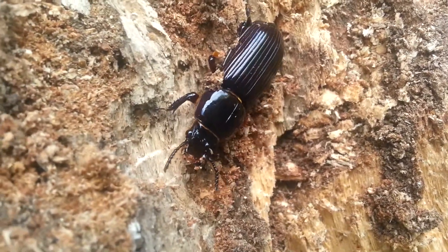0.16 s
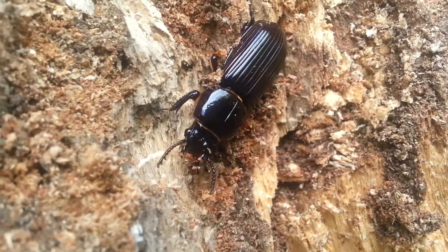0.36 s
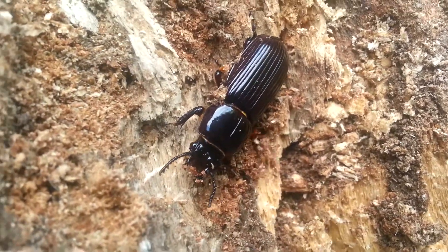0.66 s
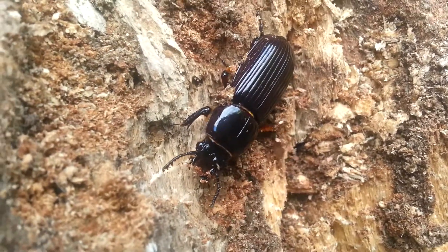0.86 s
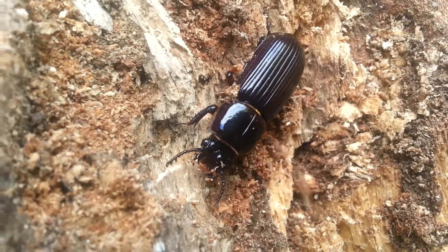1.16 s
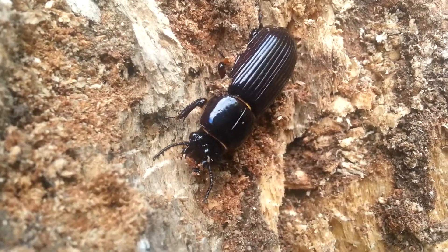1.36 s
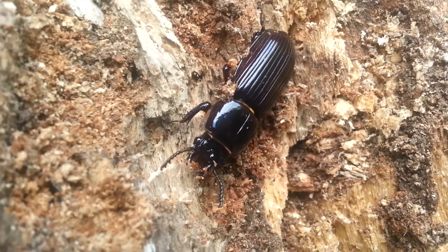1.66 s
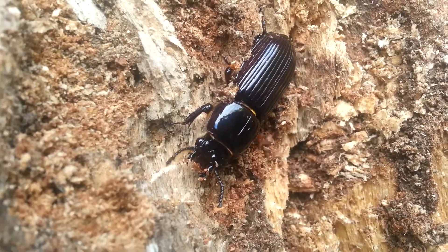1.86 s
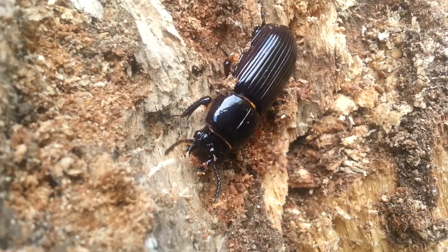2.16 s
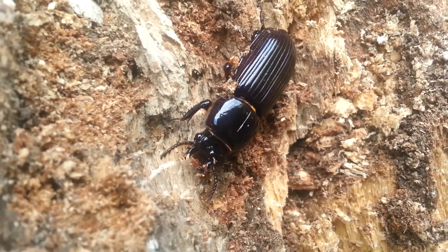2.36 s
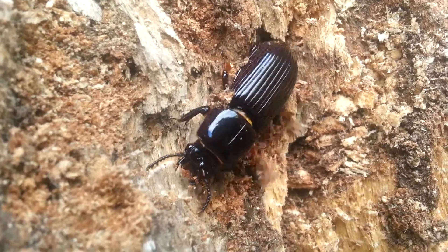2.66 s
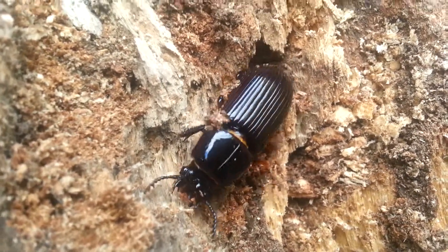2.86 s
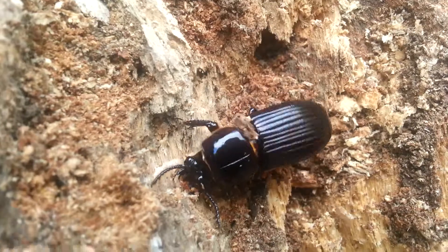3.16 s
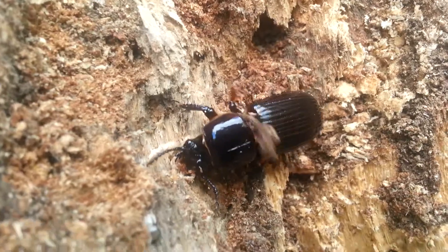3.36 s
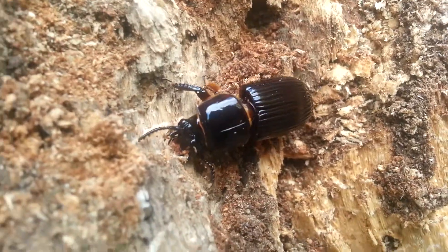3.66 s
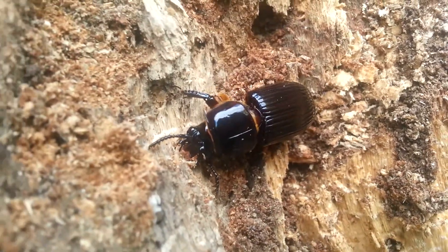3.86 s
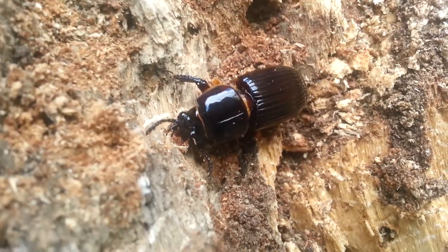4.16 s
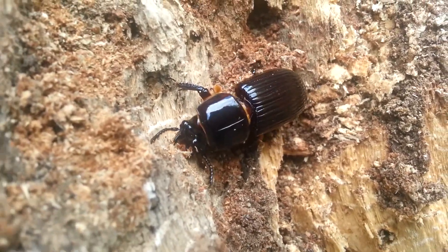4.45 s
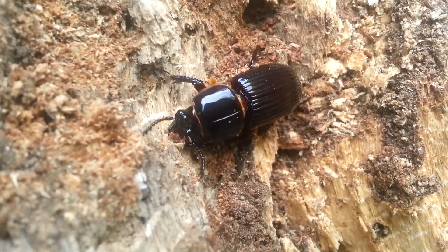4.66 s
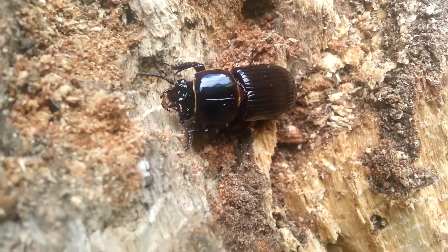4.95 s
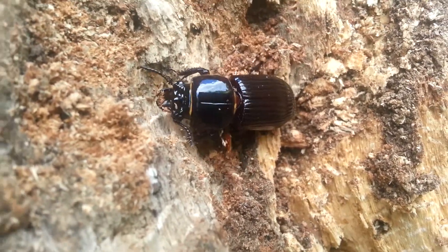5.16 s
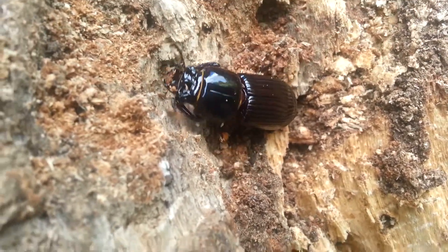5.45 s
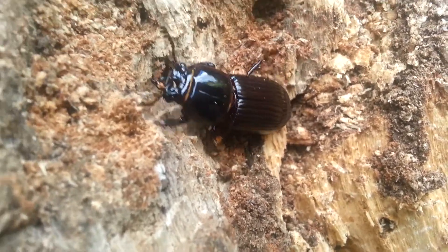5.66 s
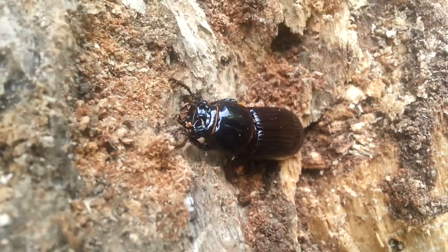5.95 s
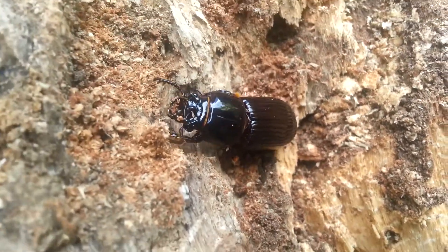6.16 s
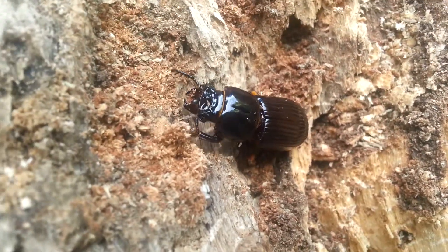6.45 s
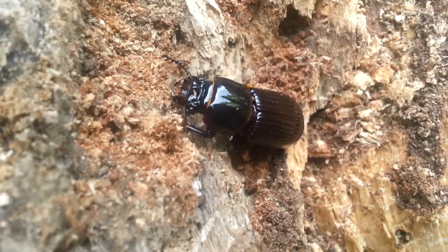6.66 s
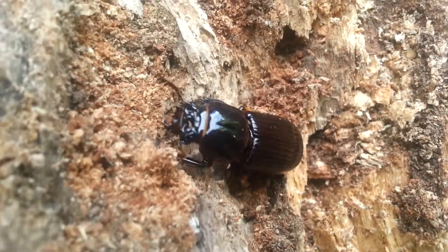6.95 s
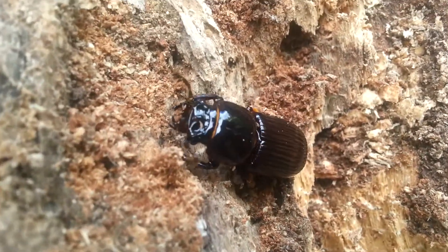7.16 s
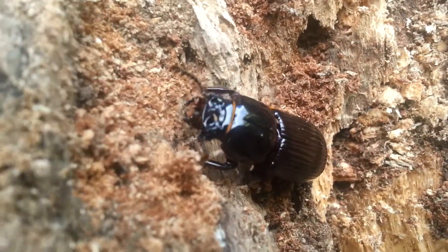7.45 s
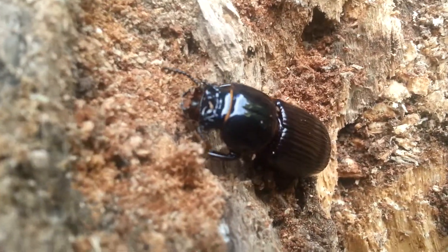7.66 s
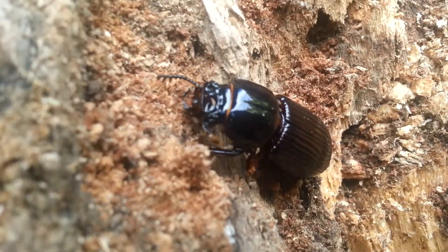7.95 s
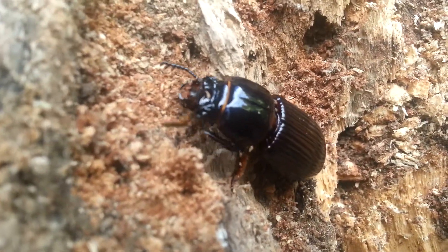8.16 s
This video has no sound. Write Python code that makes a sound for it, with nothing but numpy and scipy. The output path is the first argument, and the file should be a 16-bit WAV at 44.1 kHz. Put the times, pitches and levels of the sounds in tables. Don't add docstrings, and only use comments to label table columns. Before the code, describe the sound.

A quiet, warm outdoor yard beside a road, in wide stereo with slight microphone hiss. Tyre noise, low exhaust rumble and a fine high insect shimmer, stronger on the right, last throughout. From 0 s a low, slightly rough engine drone is present, booming at first; a dull falling thump comes near 0.9 s. From about 1.2 s the engine slows, its pitch sliding down in swells, with a last low swell near 3.2 s, gone by 4 s. Faint distant engines then hum and waver to the end. A near cricket on the left gives short pulsing chirps around 0.2, 2.5, 4.8 and 7 s, each later one weaker; fainter crickets answer between. A small bird on the left trills quick falling whistles until 0.5 s, then again in short bursts from 4.2 to 7.2 s. The last second is road hush and insects.

```python
import sys
import numpy as np
from scipy import signal
from scipy.fft import rfft, irfft, next_fast_len
from scipy.io import wavfile
from scipy.ndimage import uniform_filter1d, map_coordinates

SR = 44100
rng = np.random.default_rng(int(sys.argv[2]) if len(sys.argv) > 2 else 0)


def magnitude_from_level(level_db):
    exponent = np.asarray(level_db, float) / 20
    return 10 ** exponent


def store_pcm(level_fs):
    pcm = np.round(np.clip(level_fs, -1, 1) * 32767).astype(np.int16)
    wavfile.write(sys.argv[1], SR, np.atleast_2d(pcm).T)


N = 365588


def unit(x):
    return x / np.sqrt(np.mean(x ** 2) + 1e-20)


def along(points, hz):
    f, v = np.transpose(points)
    return np.interp(np.log(hz + 1), np.log(f + 1), v)


def curves(rows):
    s, *cols = np.transpose(rows)
    return [np.interp(np.arange(N) / SR, s, c) for c in cols]


def wobble(rate_hz):
    knots = rng.standard_normal(int(N * rate_hz / SR) + 4)
    return map_coordinates(knots, [np.arange(N) * rate_hz / SR])


def filtered(x, response):
    m = next_fast_len(N + 8192)
    return irfft(rfft(x, m) * response(np.fft.rfftfreq(m, 1 / SR)), m)[..., :N]


def rush(spectrum, alike, patchy_db):
    z = signal.stft(rng.standard_normal((2, N)), nperseg=512)[2]
    field = uniform_filter1d(rng.standard_normal(z.shape[1:]), size=5, axis=0)
    field = uniform_filter1d(field, size=14, axis=1)
    pair = signal.istft(z * magnitude_from_level(patchy_db * unit(field)), nperseg=512)[1][:, :N]

    def response(hz):
        turn = np.arccos(np.clip(along(alike, hz), -1, 1)) / 2
        return magnitude_from_level(along(spectrum, hz)) * [np.cos(turn), np.sin(turn)]

    mid, side = filtered(pair, response)
    return unit(np.array([mid + side, mid - side]))


def add(out, s, note, pan_db, turn):
    i = max(round(s * SR) - len(note) // 2, 0)
    pan = magnitude_from_level([[pan_db / 2], [-pan_db / 2]])
    phase = np.exp([[0], [-1j * turn]])
    out[:, i:i + len(note)] += (note * pan * phase).imag


def stroke(hz, length_s, sag):
    u = np.arange(round(length_s * SR)) / (length_s * SR)
    swell = np.sin(np.pi * u ** 2.3) ** 0.51
    return swell * np.exp(2j * np.pi * np.cumsum(hz * (1 - sag * (u - .5))) / SR)


SPREAD = np.pi / 8


def order(cycles, k, db, flutter_db, drift):
    phase = 2 * np.pi * k * cycles + SPREAD * k ** 2 + drift * wobble(3.4)
    return np.sqrt(2) * magnitude_from_level(db + flutter_db * wobble(9)) * np.sin(phase)


def running():
    return np.clip((3.95 - np.arange(N) / SR) / 0.35, 0, 1)


# (centre [Hz], spread [Hz], level [dB])
CHORUS_BANDS = [(4860, 140, -5.5), (5060, 220, -.5), (5280, 220, -.5), (5480, 200, -4), (5720, 180, -6.5),
                (7135, 110, -13)]


def chorus(rows_per_8_s=70):
    out = np.zeros((2, N + SR))
    shimmer = 0
    for hz, spread_hz, db in CHORUS_BANDS:
        for s, detune, size, pan, turn in rng.random((round(rows_per_8_s * N / SR / 8), 5)):
            note = magnitude_from_level(db - 64.0 - 4.3 * size) * stroke(hz + spread_hz * (detune - .5), .02, 0.013)
            pan_db = -3 + 8 * (pan - .5)
            for k in range(4):
                turned = note * np.exp(1j * k * k * turn)
                add(out, s * N / SR + k * .04, turned, pan_db, 2 * np.pi * turn)
        band = [(1000, -120), (hz - 3.1 * spread_hz, -40), (hz - spread_hz / 2, 0),
                (hz + spread_hz / 2, 0), (hz + 5.5 * spread_hz, -40), (15000, -120)]
        level = magnitude_from_level(db - 68.5 + 1.85 * wobble(9))
        shimmer = shimmer + level * rush(band, [(5000, 0.06)], patchy_db=1.5)
    fading = magnitude_from_level(1.97 - 0.37 * np.arange(N) / SR)
    return fading * (out[:, :N] + shimmer * magnitude_from_level([[-.9], [.9]]))


# (time [s], level [dB])
SCATTER = [(0, -14), (3, -13), (5, -8), (7, -1.5)]


def yard(near, others):
    sent = magnitude_from_level(curves(SCATTER)[0]) * near + magnitude_from_level(-15) * others
    t = np.arange(SR // 4) / SR
    tail = rng.standard_normal((2, len(t))) * magnitude_from_level(-60 * t / .16) * (t > .004)
    return signal.fftconvolve(sent, tail / np.linalg.norm(tail[0]), axes=1)[:, :N]


# (start [s], end [s], first pitch [Hz], last pitch [Hz], level [dB])
FAR_ENGINES = [(3.9, 4.9, 148, 142, -53), (4.1, 4.8, 152, 150, -57), (3.3, 6, 58, 57, -70),
               (3.6, 5.9, 198, 197, -58), (4.1, 5.6, 98, 96, -61), (5.0, 5.8, 175, 168, -58),
               (5.6, 6.6, 141, 139, -57.5), (5.7, 9.6, 178, 178, -57.5), (7.2, 8.6, 105, 110, -58),
               (2.6, 3.5, 200, 190, -54), (6.7, 7.3, 150, 150, -58)]
# (start [s], end [s], first pitch [Hz], last pitch [Hz], level [dB])
RUT = (.84, .885, 300, 220, -42)


def far_engines():
    t, out = np.arange(N) / SR, 0
    for start, end, first_hz, last_hz, db in FAR_ENGINES + [RUT]:
        u = np.clip((t - start) / (end - start), 0, 1)
        cycles = np.cumsum(first_hz + (last_hz - first_hz) * u) / SR
        out = out + np.sqrt(np.abs(np.sin(np.pi * u))) * order(cycles, 1, db, 1.8, .7)
    return out


# (time [s], nearness [dB])
TRAFFIC = [(0, 0.5), (.1, 3.5), (.95, 2.5), (1.3, 1.5), (2.2, 0), (3.1, 0.5), (3.9, -0.5), (4.5, 1),
           (4.85, -1), (5.4, 0), (6.4, -1), (6.75, -1), (7.4, -.5), (8.29, 0)]
# (frequency [Hz], density [dB per Hz])
RUMBLE_SPECTRUM = [(25, -41), (36, -34), (55, -15), (70, -12), (100, -0.5), (180, 0), (220, -5.5),
                   (320, -12.5), (500, -45.5)]
# (frequency [Hz], density [dB per Hz])
ROAR_SPECTRUM = [(150, -44), (260, -2.5), (500, 0), (800, -4.5), (1050, -9), (1400, -32)]
# (frequency [Hz], density [dB per Hz])
HISS_SPECTRUM = [(600, -11), (1000, 5), (1600, 0), (2000, -4), (2500, -2), (3200, -5), (4500, -3.5),
                 (5900, -14.5), (6400, -13), (8000, -19), (12000, -27)]
# (frequency [Hz], correlation [1])
LIKENESS = [(40, 0.81), (100, 0.99), (180, 0.95), (300, 0.8), (450, 0.83), (650, 0.31), (800, 0.068),
            (950, 0.77), (1150, 0.74), (1450, 0.065), (5000, 0.045)]
RUMBLE_DB, ROAR_DB, HISS_DB = -50.5, -52.5, -56.5
RUMBLE_GROWS, ROAR_GROWS, HISS_GROWS = 2.4, 1, 1.1
EXHAUST_DB = -3.5


def road_noise():
    near_db, = curves(TRAFFIC)
    exhaust = running() * magnitude_from_level(curves(ENGINE_LEVELS)[0] + EXHAUST_DB)
    rumble = np.hypot(magnitude_from_level(RUMBLE_DB + RUMBLE_GROWS * near_db), exhaust) * magnitude_from_level(0.56 * wobble(4))
    roar = magnitude_from_level(ROAR_DB + ROAR_GROWS * near_db + 0.88 * wobble(2.983))
    hiss = magnitude_from_level(HISS_DB + HISS_GROWS * near_db + 0.39 * wobble(2.39))
    noise = rumble * rush(RUMBLE_SPECTRUM, LIKENESS, patchy_db=-0.33)
    noise += roar * rush(ROAR_SPECTRUM, LIKENESS, patchy_db=0.88)
    noise += hiss * rush(HISS_SPECTRUM, LIKENESS, patchy_db=0.33)
    return noise


# (frequency [Hz], left minus right [dB])
SHADING = [(60, 1), (200, 0.5), (300, 0), (500, -0.8), (740, -5), (1200, 4.5), (2000, 3.5), (3300, 1),
           (5500, -1.5)]
# (frequency [Hz], left leads by [rad])
PHASE_LEAD = [(200, 0), (300, .1), (470, .3), (650, .9), (800, 2), (900, 3), (1300, 3.1)]


def at_ports(x):
    side = np.array([[.5], [-.5]])

    def response(hz):
        return magnitude_from_level(side * along(SHADING, hz)) * np.exp(1j * side * along(PHASE_LEAD, hz))

    return filtered(x, response)


CHIRP_STROKE_S = .017


def crickets(chirps, turn):
    out = np.zeros((2, N + SR))
    for start, strokes, rate_hz, hz, db, pan_db in chirps:
        for k in range(round(strokes)):
            cold = .35 * np.exp(-k / .9) + .65 * np.exp(-k / 4.5)
            size = magnitude_from_level(db + .5 - 2.8 * cold + rng.normal(0, .7))
            size = size * np.exp(2j * np.pi * rng.random())
            note = stroke(hz * (1.005 - .027 * cold), CHIRP_STROKE_S * (1 + .25 * cold), .022)
            add(out, start + k / rate_hz + .001 * cold ** 2, size * note, pan_db, turn)
    return out[:, :N]


# (stroke rate [Hz], wing pitch [Hz], left minus right [dB])
FAINT_SINGERS = [(37.3, 3890, 3), (39.2, 4125, 6), (40, 4310, -2), (38, 4050, -4), (22, 5480, -5),
                 (22, 4850, -6), (30, 5750, -6), (39.2, 2850, -5), (39.4, 2980, -5)]
# (first stroke [s], singer [index], strokes [count], peak [dB])
FAINT_CHIRPS = [(1.451, 0, 11, -61), (3.824, 0, 11, -62), (6.733, 0, 13, -61), (.36, 1, 9, -60),
                (.69, 1, 16, -59), (2.297, 1, 13, -59), (4.179, 1, 6, -60), (6.628, 1, 4, -59),
                (7.495, 2, 10, -66), (3.404, 3, 7, -67), (.24, 4, 3, -61), (.89, 4, 3, -57),
                (1.54, 4, 3, -57), (2.17, 4, 3, -57), (2.87, 4, 3, -62), (3.6, 4, 3, -58), (4.3, 4, 4, -57),
                (5.9, 5, 4, -63), (6.42, 5, 4, -61), (8.02, 6, 3, -61), (1.312, 7, 75, -67),
                (3.22, 8, 28, -68)]


def faint_crickets():
    chirps = []
    for start, who, strokes, db in FAINT_CHIRPS:
        rate_hz, hz, pan_db = FAINT_SINGERS[who]
        chirps.append((start, strokes, rate_hz, hz, db, pan_db))
    return crickets(chirps, turn=2.1)


# (last note [s], notes [count], last level [dB], swell per note [dB], hooked top [dB])
TRILLS = [
    (.101, 4, -54, .8, -6),
    (.5356, 5, -54.5, .8, -2),
    (4.281, 3, -57, -1, -8),
    (4.7297, 2, -58, 3, 3),
    (5.1427, 6, -52.5, 2.2, 0),
    (5.539, 5, -55.5, 2.4, 5),
    (5.9428, 5, -54.5, -.5, -3),
    (6.36, 5, -52, .3, -7),
    (6.7591, 5, -52, .1, -6),
    (7.1839, 4, -53, .5, -9),
]
# (time [s], note length [s], spacing share [1], top pitch [Hz])
SONG = [(.1, .017, 1, 3700), (.5, .017, .96, 3750), (5.5, .016, .96, 4080), (6.2, .019, 1, 3860)]
# (before the last [s], accent [dB])
PHRASE_NOTES = [(0, 0), (.0292, -1.5), (.0565, 0), (.088, 0), (.1175, -6), (.149, -5)]
MIDDLE_DB, TOP_RISES_DB, UNEVEN_VOICE_DB = -2.5, -0.5, 0.5
CLIMB_HZ = 55


def bird():
    out = np.zeros((2, N + SR))
    when, *song = np.transpose(SONG)
    for last, notes, db, swell_db, hook in TRILLS:
        length, pace, top_hz = (np.interp(last, when, v) for v in song)
        u = np.arange(round(length * SR)) / (length * SR)
        chance = rng.standard_normal((len(PHRASE_NOTES), 4))
        for back, (before, accent_db) in enumerate(PHRASE_NOTES[:round(notes)]):
            luck = chance[back]
            middle_db = MIDDLE_DB + UNEVEN_VOICE_DB * luck[0]
            top_db = hook - TOP_RISES_DB * back - 1.0 + UNEVEN_VOICE_DB * luck[1]
            hook_db = 2 * min(top_db, 0) + max(top_db, 0) - 3
            voiced_db = np.interp(u, [0, .2, .45, .62, .8, 1],
                                  [hook_db - 12, hook_db, middle_db, middle_db - 5, 0, -12])
            start_hz = top_hz - CLIMB_HZ * back + 60 * luck[2]
            hz = start_hz - (start_hz - 3060) * u ** 1.4
            size = magnitude_from_level(db - swell_db * back + accent_db + 1.4 * luck[3] + voiced_db)
            note = size * np.exp(2j * np.pi * np.cumsum(hz) / SR)
            add(out, last - pace * before - 0.33 * length, note, pan_db=13.5, turn=-.1)
    return out[:, :N]


# (first stroke [s], strokes [count], stroke rate [Hz], peak [dB])
NEAR_CHIRPS = [
    (.0725, 12, 39.9, -46),
    (2.372, 12, 40, -47),
    (4.644, 12, 39.1, -51),
    (6.8145, 12, 39.3, -54.5),
    (7.122, 1, 39.3, -57),
]
NEAR_HZ, NEAR_PAN_DB = 4312, 8.3


def near_cricket():
    chirps = [(s, k, rate_hz, NEAR_HZ, db, NEAR_PAN_DB) for s, k, rate_hz, db in NEAR_CHIRPS]
    return crickets(chirps, turn=.85)


# (time [s], firing level [dB], uneven level [dB])
ENGINE_LEVELS = [
    (0, -44, -40),
    (1.1, -45, -42.5),
    (1.6, -45, -53.5),
    (2.05, -51, -62.5),
    (2.45, -45.5, -60),
    (2.7, -50.5, -57),
    (3.15, -42, -55),
    (3.45, -51, -60),
    (3.8, -61, -59),
]
# (time [s], cycle rate [Hz])
CYCLE_RATE = [(1.15, 15.14), (1.35, 14.4), (1.8, 14.15), (2, 13.65), (2.55, 13.55), (2.85, 12.65),
              (3.22, 12.1), (3.45, 9.65), (3.8, 8.9)]
FIRING_ORDERS = (6, 9, 12)
# (order [1], level [dB])
UNEVEN_ORDERS = [(7, -16), (8, -13), (10, -13), (11, -1.5), (13, .5), (14, -10), (15, -10), (16, -18),
                 (17, -19), (18, -19), (21, -19)]
# (frequency [Hz], gain [dB])
PIPE_RESPONSE = [(60, -22), (74, -12), (84, -17), (100, -11.5), (114, -3), (125, 1.5), (172, -0.5),
                 (182, -9)]
# (time [s], half length [s], gain [dB])
WALL_BOOMS = [
    (0.548, 0.55, 16.5),
    (1.14, 0.059, 15),
    (1.55, 0.037, 12),
]


def engine():
    firing_db, uneven_db = curves(ENGINE_LEVELS)
    speed, t = curves(CYCLE_RATE)[0], np.arange(N) / SR
    cycles = np.cumsum(speed) / SR
    boom_db = sum(db * np.exp(-((t - s) / half) ** 4) for s, half, db in WALL_BOOMS)
    firing = 0
    for k in FIRING_ORDERS:
        db = firing_db + along(PIPE_RESPONSE, k * speed) + boom_db * (k == FIRING_ORDERS[0])
        firing = firing + order(cycles, k, db, .7, .15)
    uneven = sum(order(cycles, k, uneven_db + db, 1.0, .2) for k, db in UNEVEN_ORDERS)
    return running() * (firing + uneven)


def scene():
    road = at_ports(road_noise() + far_engines() + engine())
    near = near_cricket()
    others = faint_crickets() + bird()
    return chorus() + road + near + others + yard(near, others)


def top_cut(x):
    return signal.sosfilt(signal.butter(12, 15750, fs=SR, output="sos"), x)


# (frequency [Hz], density [dB per Hz])
SELF_NOISE = [(1000, 1), (4000, -3), (8000, 1.5), (14400, 3.5), (14550, -52)]


def record(dry):
    mix = dry + magnitude_from_level([[-65.2], [-65.8]]) * rush(SELF_NOISE, [(1000, 0)], patchy_db=.2)
    mix = filtered(mix, lambda hz: hz < 14520)
    return top_cut(mix)


dry = scene()
out = record(dry)
store_pcm(out)
```